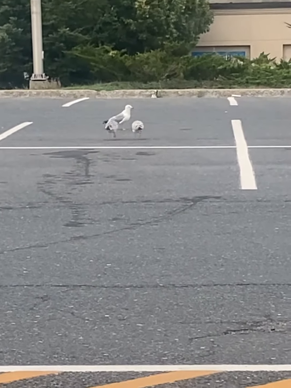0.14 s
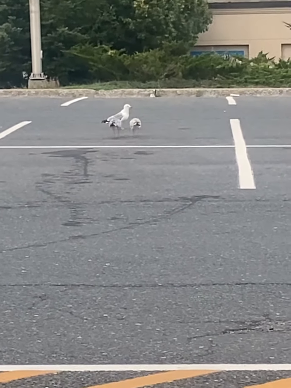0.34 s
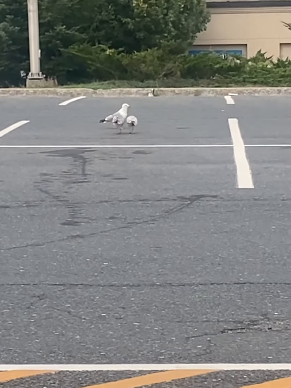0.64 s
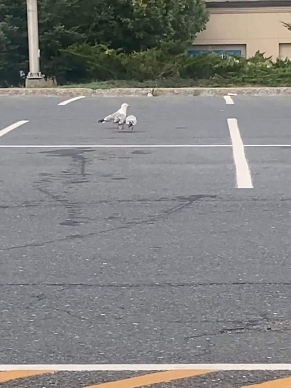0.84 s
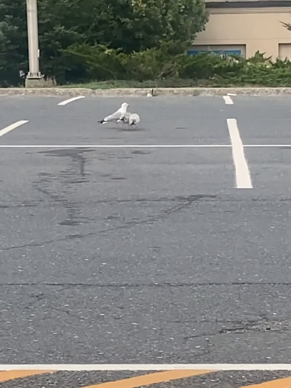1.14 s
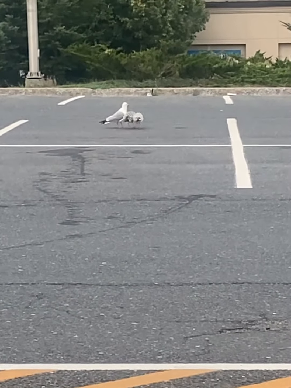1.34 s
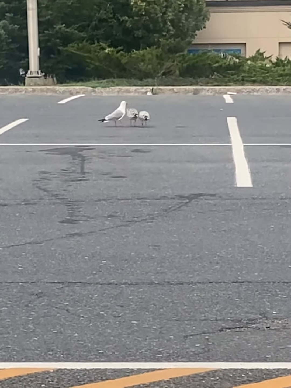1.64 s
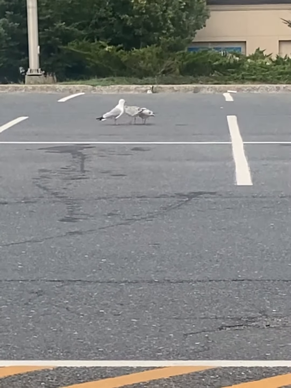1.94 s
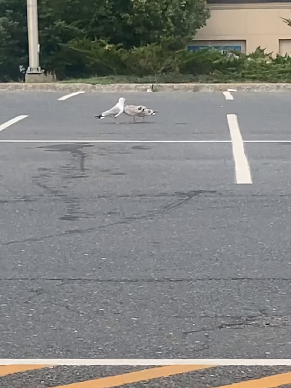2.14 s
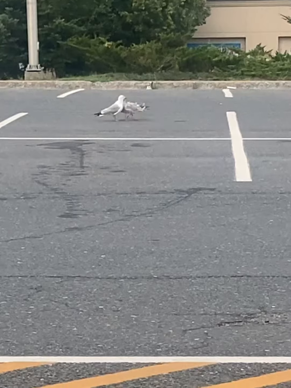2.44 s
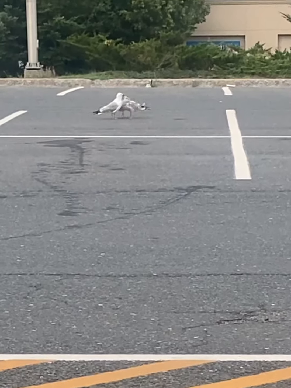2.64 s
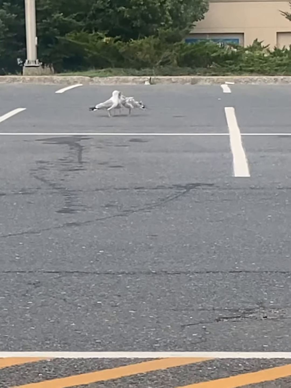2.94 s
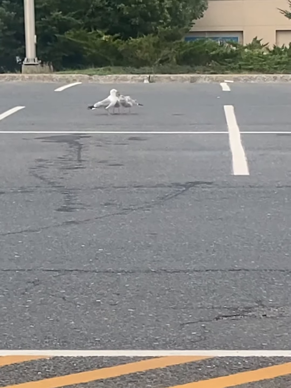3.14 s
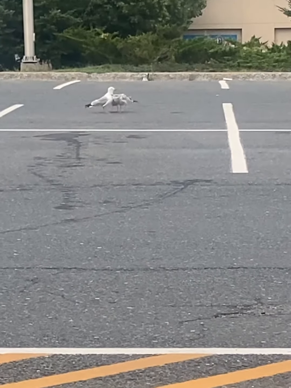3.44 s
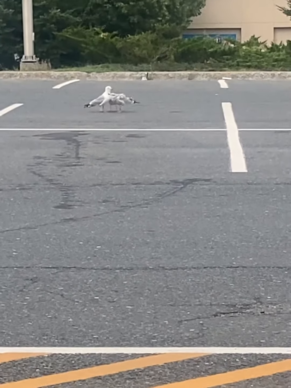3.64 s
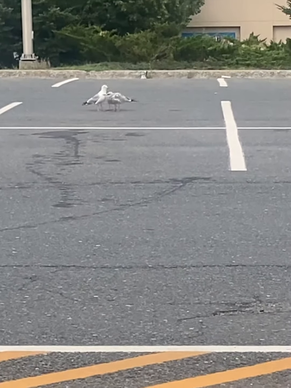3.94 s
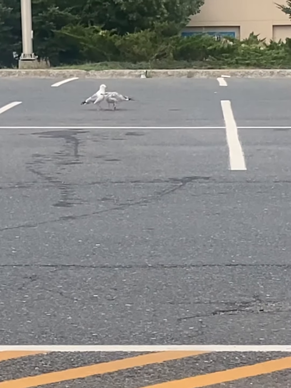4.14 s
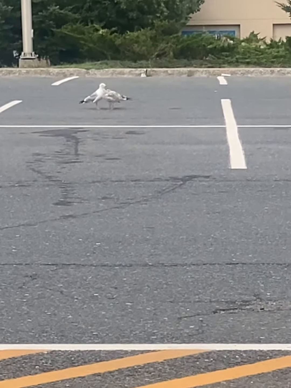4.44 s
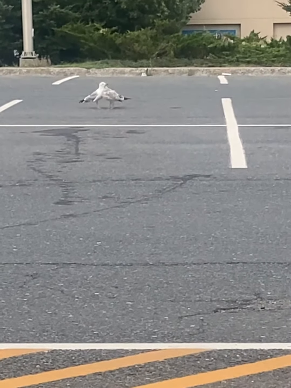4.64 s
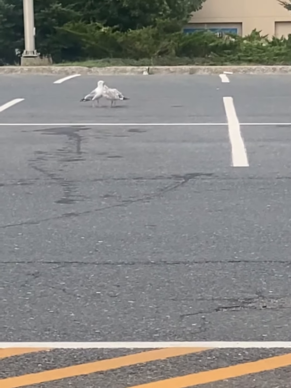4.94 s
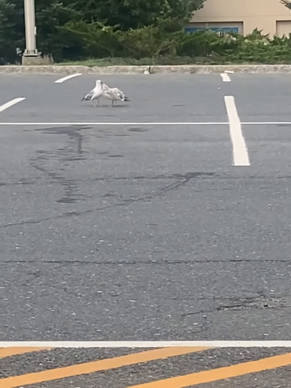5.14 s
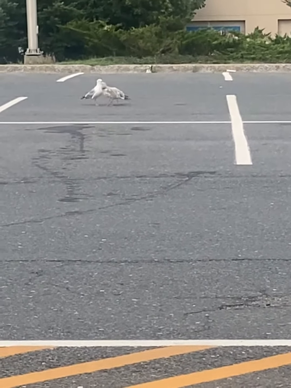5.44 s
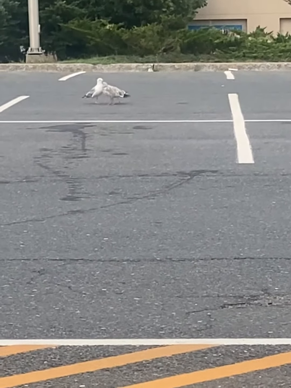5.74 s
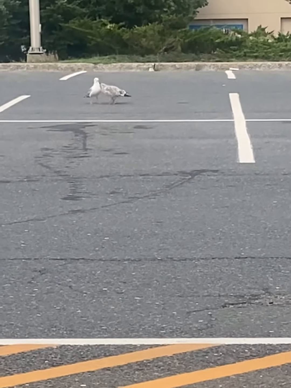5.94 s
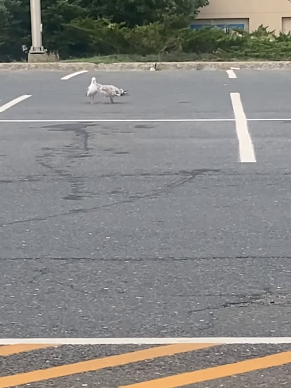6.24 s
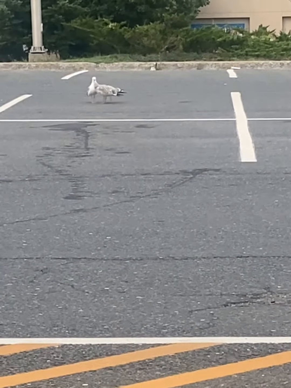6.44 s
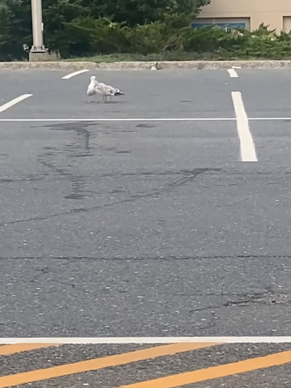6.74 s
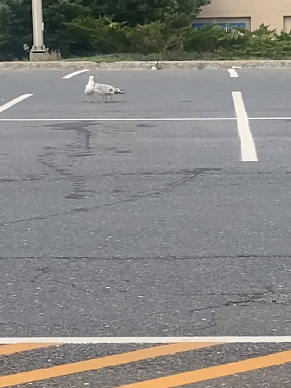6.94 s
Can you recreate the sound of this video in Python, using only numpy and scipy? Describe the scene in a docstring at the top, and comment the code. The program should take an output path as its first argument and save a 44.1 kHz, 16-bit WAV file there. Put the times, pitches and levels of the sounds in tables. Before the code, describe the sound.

Young gulls beg in an open car park with thin, high, overlapping whistles that jump between pitches and echo lightly off walls. The calls start faint and raspy, with a far flock behind them, then turn louder and drier. Low wind rumbles on the microphone, growing stronger with a few soft thumps, over a steady hush of distant traffic.

```python
"""Young gulls beg on an open car park: thin, overlapping whistles that break from pitch to pitch,
thrown back by walls over a far traffic hush. At first they are faint and raspy, heads turned away,
with a far flock and a brief high hiss behind them. From 2.5 s they come through louder and drier
as the flock fades. Wind rumbles harder on the two microphone ports, and its eddies thump most near
3.3 s. A small dull tick falls at 5.6 s; the last call ends just before 7 s."""
import sys
import numpy as np
from scipy import signal
from scipy.fft import rfft, irfft, next_fast_len
from scipy.io import wavfile
from scipy.ndimage import uniform_filter1d

SR = 44100
rng = np.random.default_rng(int(sys.argv[2]) if len(sys.argv) > 2 else 0)


def materialize(psi):
    """Save the field psi as 16-bit PCM at rate SR to the path in sys.argv[1].

    A 1-D psi becomes a single channel; in a 2-D psi each row is a channel.
    """
    bounded = np.clip(np.atleast_2d(psi).T, -1, 1)
    quanta = np.round(bounded * 32767).astype(np.int16)
    wavfile.write(sys.argv[1], SR, quanta)


N = 311787
TOP_HZ = 15700  # high cut of the mix

# Scoops that open the calls: t/s, length/s, from f/Hz, lowest f/Hz, to f/Hz, mid-note level/dB,
# level ramp/dB, second harmonic over the first/dB
GULL_SCOOPS = [ (0.286, 0.084, 4250, 3840, 3970, -55, 2, -37),
               (0.563, 0.068, 4420, 3786, 3940, -52, 0.5, -35),
               (1.004, 0.061, 4520, 3840, 3900, -65, -2, -36),
               (1.099, 0.078, 4040, 3785, 3890, -57, 2.5, -18.5),
               (1.486, 0.079, 4054, 3757, 3900, -60.5, 5, -30),
               (1.767, 0.079, 4140, 3756, 3980, -58, 4, -44),
               (1.958, 0.069, 3774, 3733, 3745, -55, 4, -16.5),
               (2.467, 0.068, 4000, 3676, 3820, -53, 5.5, -29.5),
               (3.46, 0.077, 4000, 3725, 3930, -52.5, 3.5, -20),
               (3.719, 0.045, 3720, 3510, 3520, -49, 5, -18),
               (4.44, 0.085, 4030, 3725, 3920, -51.5, -8, -16),
               (5.429, 0.079, 4100, 3810, 4080, -53, -13, -13),
               (6.37, 0.077, 4020, 3695, 3860, -56, -1, -16.5), ]


def scoop(start, length, from_hz, low_hz, to_hz, level_db, ramp_db, second_db):
    """A gull hooks up to its note from below, slides down, lingers and flicks up again."""
    progress = np.linspace(0, 1, round(length * SR))
    fall, bottom, upturn = 0.1606, 0.66, 0.813  # shares of the length
    bend = np.interp(progress, [0, fall, bottom, upturn, 1], [0.011, 0.12, 1, 0.99, 2])
    depth = np.sin(np.pi / 2 * bend) ** 2
    rim_hz = np.where(progress < bottom, from_hz, to_hz)
    hook_hz = 128 * np.exp(-progress * length / 0.0059)
    hz = rim_hz + (low_hz - rim_hz) * depth - hook_hz
    effort_db = np.interp(progress, [0, 0.21], [-6, 0]) + ramp_db * (progress - 0.5)
    return whistle(start, hz, level_db, effort_db, second_db)


# Held notes, and two faint echoes of earlier notes (at 0.375 s and 1.5 s):
# t/s, length/s, from f/Hz, to f/Hz, entry offset/Hz, end droop/Hz, opening level/dB,
# level ramp/dB, second harmonic over the first/dB; some add pitch arch/Hz, mid-note swell/dB
GULL_TONES = [ (0, .12, 4010, 3580, 1, 286, -67, -4.5, -27), (0.191, .03, 4180, 4300, -2, 1, -66, 4, -33),
              (.375, .12, 3900, 3900, 0, 0, -64, 0, -35), (.635, .035, 3880, 4060, 0, 0, -58, 0, -22),
              (0.193, 0.05, 3870, 3680, -2, -2, -65.5, -6, -31),
              (0.365, 0.041, 4700, 4790, -5, 0, -60.5, 3, -30),
              (0.406, .092, 5810, 5740, 0, 140, -66, 0, -42),
              (.498, .058, 5760, 5640, -150, 120, -65, 0, -42),
              (0.629, 0.042, 4060, 4340, 2, 1, -53, -5, -18),
              (0.679, 0.16, 5550, 5010, -250, 18, -56.5, -11, -40),
              (.215, 0.053, 4730, 4700, 0, 60, -74, -4, -35), (.553, .025, 5500, 4650, 0, 0, -72, 0, -35),
              (.715, .03, 4260, 4430, 1, 0, -62, 0, -20), (1.117, .09, 5400, 5340, -5, 0, -73, -4, -35),
              (4.55, 0.054, 3410, 3390, 2, 0, -80, 0, 0), (5.53, .12, 3500, 3350, -1, -1, -77, -1, -6.5),
              (6.804, .012, 3240, 3156, 0, -3, -69, -1, -35),
              (0.875, .128, 4150, 3350, 0, 60, -62, -5, -36, 200, -2),
              (1.062, 0.052, 4150, 4420, -4, -5, -68, 7, -40),
              (1.174, 0.042, 4580, 4740, -4, -2, -68, 2, -9),
              (1.214, .121, 5830, 5370, -260, 0, -67.5, 7.5, -32),
              (1.386, 0.096, 4400, 4260, 130, -1, -67.5, -1, -21),
              (1.561, 0.23, 4640, 4380, -100, 250, -69.5, -3, -20),
              (1.5, .12, 5800, 5480, 2, 0, -79, 2, -40), (1.847, 0.088, 3780, 3390, 0, 143, -72, 1, -27),
              (1.85, 0.074, 4580, 4540, 2, 2, -62.5, -12, -24),
              (2.0, 0.1, 4270, 3950, -6, 6, -73.5, 7.5, -35), (2.028, 0.032, 4470, 4620, 3, 1, -67, 3, -12),
              (2.064, 0.084, 5400, 5430, 0, -3, -61.5, -6, -37),
              (2.143, 0.034, 4870, 4730, -2, -1, -75, 4, -27),
              (2.173, .173, 4570, 4240, -7, 170, -68.5, -2.5, -22.5),
              (2.535, .037, 3970, 4300, 2, 0, -49, -16, -26),
              (2.573, 0.1, 5080, 5230, 2, -200, -63, -8, -27),
              (2.665, .056, 4390, 4470, 3, 0, -62.5, 4, -40),
              (2.722, 0.17, 3880, 3670, 71, 200, -59, -3, -28),
              (2.855, 0.045, 3840, 3855, -3, -8, -48.5, 2, -19.5),
              (2.901, 0.034, 4505, 4580, 0, -3, -49, -1, -12.5),
              (2.937, 0.14, 5510, 5300, -2, 35, -53.5, -1.5, -37),
              (3.068, 0.023, 4850, 4730, -4, 0, -61, 0, -18),
              (3.087, 0.14, 4370, 4204, 111, 124, -57, -4, -4.5),
              (3.534, 0.1044, 4570, 4800, -200, 0, -56.5, 5.5, -28.5),
              (3.637, .07, 4710, 4340, 100, 100, -51, -9, -26),
              (3.708, 0.2, 3840, 3460, 1, 164, -58.5, -6.5, -17),
              (3.766, 0.046, 4130, 4150, 0, 2, -49, 0.5, -14.5),
              (3.81, .28, 5010, 4600, 3, 130, -49, -14, -19, 65, -1),
              (4.09, 0.027, 4040, 3950, 0, 2, -59, -2, -33),
              (4.518, 0.225, 4620, 4320, -250, 200, -53, -9, -23, 0, 1),
              (4.597, 0.037, 3390, 3630, 3, 2, -61.5, -0.5, -3.5),
              (4.628, 0.027, 4010, 4280, -3, 0, -52, -21, -14),
              (4.667, 0.0656, 5230, 5160, -170, 2, -57, 0, -15, 0, 4),
              (4.737, 0.044, 5300, 5200, 0, 40, -56, -2, -21),
              (4.739, .078, 3860, 3810, 180, 0, -55, 0, -30), (4.828, .058, 3790, 3630, 0, 0, -67, -1, -18),
              (4.782, .085, 5030, 5000, 60, 0, -58, -8, -32, 0, 7),
              (4.9, .045, 4920, 4610, 0, 0, -68, 0, -30), (4.948, .028, 4180, 3690, -1, 1, -68.5, -4, -32),
              (4.978, .015, 3280, 3230, -1, 0, -60.5, 2, -36),
              (5.5, .067, 3660, 3850, -4, -200, -64, 8, -39),
              (5.502, 0.182, 4600, 4590, -300, -1, -57, -5, -29, 0, -2),
              (5.568, .296, 4900, 4760, -240, 200, -57, -10, -40, 20, 0),
              (5.681, 0.18, 3790, 3660, 187, 241, -60.5, -8.5, -20),
              (5.864, 0.024, 4000, 3890, -2, 0, -59, 1, -39),
              (6.438, 0.025, 3800, 4010, -5, 2, -65, 0, -33),
              (6.446, .085, 4310, 4920, -100, 30, -58, 3.5, -25),
              (6.531, .108, 4860, 4790, 0, 0, -60.5, -2, -33),
              (6.463, .302, 4764, 4670, -320, 180, -54, -12, -30),
              (6.636, 0.175, 3890, 3600, 0, 60, -62.5, -4, -22, -70, 1),
              (6.768, 0.026, 4000, 3940, -2, -3, -54, -14, -43), ]


def gull_tone(start, length, from_hz, to_hz, entry_hz, droop_hz, level_db, ramp_db, second_db,
              arch_hz=0, swell_db=0):
    """The pitch snaps from the note just left, settles on a straight or arched glide and slides off."""
    t = np.arange(0, length, 1 / SR)
    arch = np.sin(np.pi * t / length)
    hz = from_hz + (to_hz - from_hz) * t / length
    hz += entry_hz * np.exp(-t / 0.028) - droop_hz * np.exp((t - length) / 0.018)
    hz += arch_hz * arch + voice_break(start, hz[0]) * np.exp(-t / 0.0012)
    soft_entry_db = -4 * np.exp(-t / 0.012)
    effort_db = ramp_db * (t / length - 0.5) + swell_db * arch + soft_entry_db
    return whistle(start, hz, level_db + ramp_db / 2, effort_db, second_db)


def voice_break(start, hz):
    """The smallest leap in Hz to a note that ends within 8 ms of this start; zero if none does."""
    ends = [(s + length, to_hz) for s, length, _, _, to_hz, *_ in GULL_SCOOPS]
    ends += [(s + length, to_hz - droop_hz) for s, length, _, to_hz, _, droop_hz, *_ in GULL_TONES]
    return min((end_hz - hz for s, end_hz in ends if abs(s - start) < 0.008), key=abs, default=0)


# Bite of the third harmonic: its f/Hz, base level over the second/dB
THIRD_HARMONIC = [(10000, -9), (11600, -19.5), (13000, -11.5), (15500, -1.5)]


def whistle(start, hz, level_db, effort_db, second_db):
    """A gull's voice: a near sine with up to three overtones; pitch and breath tremble slightly."""
    size = len(hz)
    t = np.arange(size) / SR
    waver = 1 + 0.0015 * wander(size, 200) + 0.0038 * wander(size, 900)
    phase = 2 * np.pi * np.cumsum(hz * waver) / SR
    flicker_db = 3.4 * tremble(size, 900) + 1.8 * tremble(size, 200)
    if level_db + second_db > -70:  # strong overtones hold steadier
        flicker_db *= 0.4
    second_db = second_db - 0.75 * effort_db + flicker_db  # overtones resist swells and fades
    level_db = level_db + effort_db
    pierce_db = 0.5 * (level_db + second_db + 68)  # loud squeals pierce more
    third_db = second_db + over_pitch(THIRD_HARMONIC, 3 * hz) + pierce_db
    tone = np.sin(phase) + gain_of(second_db) * np.sin(2 * phase)
    tone += gain_of(third_db) * np.sin(3 * phase) * (3 * hz < TOP_HZ)
    tone += gain_of(second_db - 23) * np.sin(4 * phase) * (4 * hz < TOP_HZ)
    attack_s, release_s = 0.0041, 0.0035
    envelope = np.clip(np.minimum(t / attack_s, (t[-1] - t) / release_s), 0, 1)
    flutter_db = 1.3 * tremble(size, 600) + 0.52 * wander(size, 160) + 1.1 * wander(size, 70)
    flutter_db += 2.6 * (level_db < -60) * tremble(size, 300)  # faint, far notes break up more
    flutter_db += 2.0 * (start < 2.4) * tremble(size, 130)  # heads turned away sound raspier
    return np.sqrt(2) * tone * envelope * gain_of(level_db + flutter_db)


# Echo send, how much of the calls reaches the walls: t/s, level/dB
WALL_SEND = [(0, 6.5), (1.5, 5.5), (2.6, -4.5)]
# Slaps off the walls: delay t/s, level relative to the send/dB
WALL_SLAPS = [(.024, -18.5), (.075, -17.5), (.29, -21), (0.435, -26)]


def car_park(calls):
    """Four smeared wall echoes and a dying tail that moving air reshuffles, duller than the calls."""
    send = calls * gain_of(over_time(WALL_SEND)[0])
    body = signal.lfilter(*signal.butter(7, 5050, fs=SR), send)
    treble = signal.lfilter(*signal.butter(3, [6500, 9500], "band", fs=SR), send)
    dull = (body + gain_of(-8.5) * treble)[None]
    t = np.arange(30000) / SR
    walls = np.zeros((2, len(t)))
    for s, db in WALL_SLAPS:
        smear = rng.standard_normal(1500) * np.exp(-np.arange(1500) / 300)
        for side in walls:
            add(side, s, gain_of(db) * smear / np.linalg.norm(smear))
    drift_db = 0.79 * np.array([wander(N, 250), wander(N, 250)])
    echoes = gain_of(drift_db) * signal.oaconvolve(dull, walls, axes=1)[:, :N]
    decay_s, predelay_s = 1.25, 0.012
    for _ in range(2):  # two sets of paths fade in and out, which blurs held pitches
        scatter = rng.choice([-1., 1.], walls.shape) * (rng.random(walls.shape) < 0.05)
        tail = scatter * gain_of(-60 * t / decay_s) * (t > predelay_s)
        tail = gain_of(-14) * tail / np.linalg.norm(tail[0])
        echoes += wander(N, 350) * signal.oaconvolve(dull, tail, axes=1)[:, :N]
    return echoes


# Stereo image of the calls: f/Hz, left lead/rad, left over right/dB
CALL_IMAGE = [(1320, 0.6, 4.5), (3080, 4.5, -0.5), (3686, 4, -5), (3675, 3, -2), (3910, 0.97, -0.5),
              (4120, 0.5, -1), (4276, 1.5, -11.5), (4350, -4.5, -4), (4690, -4.5, -5), (5070, -2, -2.5),
              (5350, -5, -7.5), (5500, -2, -7), (5780, -2.5, 1.5), (14660, 6, -2.5)]


def ports(pair):
    """Each microphone port hears the sound with its own phase and balance; the summed power stays."""
    size = next_fast_len(N)
    hz = np.fft.rfftfreq(size, 1 / SR)
    points_hz, lead, pan_db = np.transpose(CALL_IMAGE)
    pan = gain_of(np.interp(hz, points_hz, pan_db))
    right = np.sqrt(2 / (1 + pan ** 2))
    left = right * pan * np.exp(1j * np.interp(hz, points_hz, lead))
    return irfft(rfft(pair, size) * np.array([left, right]), size)[:, :N]


# Fader and pan of the rumble both ports share: t/s, level/dB, left over right/dB
GUST_RIDE = [(0, -54, 0.5), (.48, -46, -1.2), (.8, -47.5, 0.5), (1.12, -44, -2), (1.44, -49.5, 0),
             (1.6, -48, 1.5), (1.85, -51, 0), (2.08, -52, -1), (2.24, -53.5, 0.5), (2.65, -42, 3),
             (2.9, -41.5, 0.5), (3.05, -41, -0.5), (3.2, -42.5, 3), (3.37, -38, -5.5), (3.53, -46, 8.5),
             (3.85, -46, 1), (4.17, -43, 2), (4.33, -45.5, 2.5), (4.55, -42, 0.5), (4.8, -41, 2.5),
             (5.05, -40.5, 1.5), (5.3, -39.5, 1), (5.6, -41.5, -0.5), (6.0, -41.5, 1), (6.4, -42, 1),
             (6.7, -40.5, 2.5), (7.07, -41, -0.5)]
# Colour of that rumble: f/Hz, relative level/dB
RUMBLE_EQ = [(12, -62), (20, -30), (46, -4.5), (75, 2), (112, -8.5), (179, -9.5), (335, -21.5), (397, -21),
             (600, -33.5), (780, -46.5), (1320, -120)]
# Fader of the buffeting that pushes the ports apart: t/s, level/dB
BUFFET_RIDE = [(0, -42.5), (1.4, -43), (2.45, -40.5), (2.75, -57.5), (3.25, -33), (3.8, -55.5),
               (4.3, -42.5), (5.1, -69.5), (5.55, -41.5), (6.25, -55), (7.07, -53.5)]
# Colour of that buffeting: f/Hz, relative level/dB
BUFFET_EQ = [(12, -45), (20, -17.5), (50, -0.5), (75, 4), (216, -14.5), (364, -23.5), (544, -37.5),
             (640, -38), (700, -49), (910, -76), (1540, -120)]


def wind():
    """Lumpy low noise, part in phase on the ports, part opposed, leaning to the port the gust hits."""
    mid_db, pan_db = over_time(GUST_RIDE)
    side_db = over_time(BUFFET_RIDE)[0]
    mid = noise(RUMBLE_EQ, patchy_db=1.5, size=4096)[0] * gain_of(mid_db + 0.82 * wander(N, 900))
    side = noise(BUFFET_EQ, patchy_db=0, size=4096)[0] * gain_of(side_db + 2.5 * wander(N, 700))
    return np.array([(mid + side) * gain_of(pan_db / 2), (mid - side) * gain_of(-pan_db / 2)])


# Eddy thumps: t/s, left level/dB, right level/dB, f/Hz, right lag/ms
EDDY_HITS = [(1.074, -30.5, -31, 124, 8.3), (2.062, -23, -26, 70.4, 6.4), (3.304, -25, -24, 86, 7.2),
             (3.355, -40, -21.5, 125, 6.9), (3.376, -33, -19.5, 86, 6.6), (4.185, -39, -28, 106, 7.2)]


def eddies():
    """Each eddy is a tapered two-cycle push of pressure that hits the left port, then the right."""
    pair = np.zeros((2, N))
    for s, left_db, right_db, hz, lag_ms in EDDY_HITS:
        cycles = np.arange(0, 2, hz / SR)
        push = np.sin(2 * np.pi * cycles) * np.sin(np.pi * cycles / 2) ** 2
        add(pair[0], s, -gain_of(left_db) * push)
        add(pair[1], s + lag_ms / 1000, -gain_of(right_db) * push)
    return pair


# Cue for the small tick: t/s, level before a 3 dB lift/dB
TICK_CUES = [(5.632, -49)]


def ticks():
    """A small tick: a dull tone and a brighter one that die fast."""
    track = np.zeros(N)
    t = np.arange(900) / SR
    ring = np.sin(2 * np.pi * 1050 * t) + gain_of(-3 - 60 * t / 0.03) * np.sin(2 * np.pi * 1950 * t)
    attack = 1 - np.exp(-t * 2500)
    for s, db in TICK_CUES:
        add(track, s, gain_of(db + 3 - 60 * t / 0.038) * attack * ring)
    return track


# Fader of the high hiss: t/s, level/dB
HISS_RIDE = [(.4, -100), (.6, -76), (.86, -75.5), (1.1, -100)]
# Colour of the hiss: f/Hz, relative level/dB
HISS_EQ = [(5500, -36), (7500, -5), (8600, 1), (10000, -12.5), (11500, -40)]


def hiss():
    """A faint, patchy high hiss that swells and fades once."""
    return noise(HISS_EQ, patchy_db=6) * gain_of(over_time(HISS_RIDE))


# Fader of the far birds: t/s, level/dB
FLOCK_RIDE = [(0, -68.5), (.9, -68.5), (1.7, -72), (2.3, -77.5), (3.2, -81)]


def flock():
    """Eight far voices drift in pitch and come and go; moving air smears each line."""
    voices = []
    for centre_hz in [3810, 4040, 4390, 4900] * 2:
        hz = centre_hz * (1 + 0.02 * wander(N, 2000))
        smeared = np.sin(2 * np.pi * np.cumsum(hz) / SR) * wander(N, 200)
        voices.append(smeared * gain_of(3.5 * wander(N, 4000)))
    pair = np.reshape(voices, (2, -1, N)).sum(1)  # four voices a side
    return unit_rms(pair + 0.6 * pair[::-1]) * gain_of(over_time(FLOCK_RIDE))


# Colour of the steady background, low traffic hush and faint top hiss, dipping near 12 kHz:
# f/Hz, relative level/dB
BED_EQ = [(110, -35.5), (180, -2.5), (261, -9.5), (449, -19), (677, -25.5), (947, -21.5), (1160, -23.5),
          (1280, -19.5), (1450, -26), (2150, -29.5), (2900, -35.5), (3500, -41.5), (5300, -48.5),
          (7500, -52.5), (10000, -53), (11900, -68), (13300, -56.5), (15600, -60)]
# Its faders: t/s, level before make-up gain/dB, lift of the low roar/dB
BED_RIDE = [(0.0, -60.5, -1.5), (1.2, -60.5, -1), (2.2, -61, -1.5), (2.8, -61.5, 0.5), (3.5, -61.5, -2),
            (4.7, -61.5, 1), (5.15, -61.5, 3.5), (5.65, -61.5, 1), (7.07, -63, 1)]
# Its stereo image: f/Hz, likeness of the ports/0-1, left lead/rad, left over right/dB
BED_IMAGE = [(207, 1, 0, 1.5), (414, 0.92, 1.01, 3), (620, 0.27, -2, 3.5), (860, 0.36, -1.5, -0.5),
             (1260, 0.82, 0.73, 1.1), (1850, 0.82, -0.06, -1.1), (3030, 0.52, 4., 0.7), (3320, 0.02, 5, 0),
             (5030, 0.87, 2.5, 2.5), (7520, 0.6, 5, -1), (9300, 1, 7, -2), (12000, 1, 8.5, 3.5),
             (14300, 0.95, 8, 0)]


def background():
    """Far traffic hush and faint top hiss, partly alike left and right; the low roar comes and goes."""
    roar_below_hz, makeup_db = 880, 9.5
    size = next_fast_len(N)
    hz = np.fft.rfftfreq(size, 1 / SR)
    likeness, lead, pan_db = (over_pitch(BED_IMAGE, hz, column) for column in (1, 2, 3))
    right, unrelated = rfft(noise(BED_EQ, patchy_db=1.5, channels=2), size)
    left = likeness * right * np.exp(1j * lead) + np.sqrt(1 - likeness ** 2) * unrelated
    spectra = np.array([left * gain_of(pan_db), right])
    hush = irfft(spectra, size)[:, :N]
    roar = irfft(spectra / (1 + (hz / roar_below_hz) ** 10), size)[:, :N]
    level_db, roar_db = over_time(BED_RIDE)
    return (hush + roar * (gain_of(roar_db) - 1)) * gain_of(level_db + makeup_db)


def noise(eq, patchy_db, size=1024, channels=1):
    """Noise coloured by an EQ curve, with drifting louder and softer patches, rms 1."""
    frames, hz = 4 * N // size + 5, np.fft.rfftfreq(size, 1 / SR)
    real, imag, patches = rng.standard_normal((frames, len(hz), channels, 3)).T
    patches = uniform_filter1d(patches[0], size=10, axis=0)  # across frequency
    patches = unit_rms(uniform_filter1d(patches, size=12288 // size, axis=1))  # across time
    spectra = (real + 1j * imag) * gain_of(over_pitch(eq, hz)[:, None] + patchy_db * patches)
    return unit_rms(signal.istft(spectra, nperseg=size, noverlap=3 * size // 4)[1][:, :N])


def wander(size, span):
    """A random modulator: noise smoothed twice over span samples, rms 1."""
    return unit_rms(uniform_filter1d(uniform_filter1d(rng.standard_normal(size), span), span))


def tremble(size, span):
    """A random modulator centred on zero over one note."""
    drift = wander(size, span)
    return drift - drift.mean()


def over_time(rows):
    """The columns of an automation curve, sample by sample."""
    s, *columns = np.transpose(rows)
    return [np.interp(np.arange(N) / SR, s, column) for column in columns]


def over_pitch(rows, hz, column=1):
    """One column of a table on a log-frequency axis."""
    columns = np.transpose(rows)
    return np.interp(np.log(hz + 1), np.log(columns[0] + 1), columns[column])


def gain_of(db):
    """Decibels to gain."""
    return 10 ** (np.asarray(db) / 20)


def unit_rms(x):
    """Scales to rms 1."""
    return x / np.sqrt(np.mean(x ** 2) + 1e-20)


def add(mix, s, sound):
    """Mixes a sound in at s seconds."""
    part = mix[round(s * SR):][:len(sound)]
    part += sound[:len(part)]


def scene():
    """Gulls and echoes reach the ports through unsteady air; wind acts on the ports directly."""
    gulls = np.zeros(N)
    for start, *shape in GULL_SCOOPS:
        add(gulls, start, scoop(start, *shape))
    for start, *shape in GULL_TONES:
        add(gulls, start, gull_tone(start, *shape))
    shimmer = gain_of(0.94 * np.array([wander(N, 1000), wander(N, 1200)]))  # each path fades on its own
    airborne = gulls * shimmer + ticks() + hiss() + car_park(gulls) + flock()
    return ports(airborne) + background() + wind() + eddies()


def record(dry):
    """A steep high cut on the whole mix."""
    high_cut = signal.firwin(2047, TOP_HZ, window=("kaiser", 11), fs=SR)
    return signal.oaconvolve(dry, high_cut[None], "same")


dry = scene()
out = record(dry)
materialize(out)
```